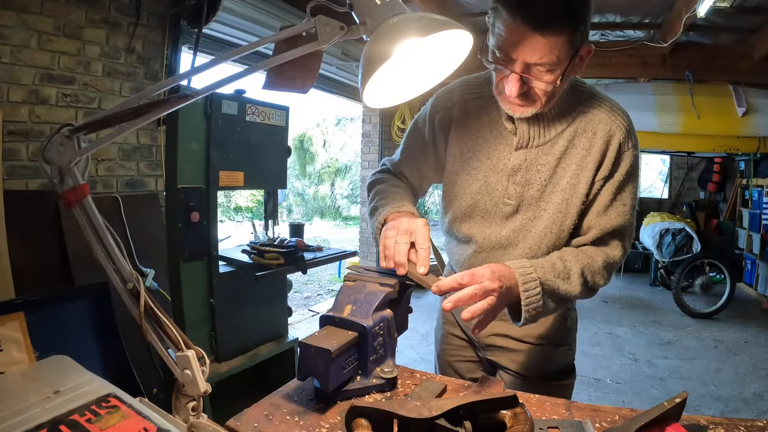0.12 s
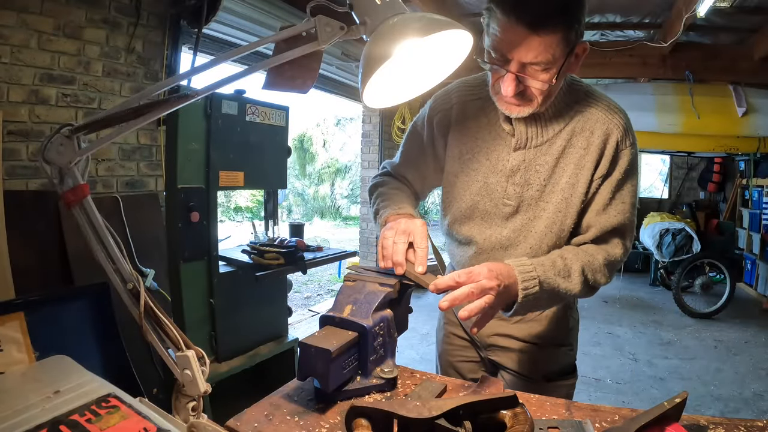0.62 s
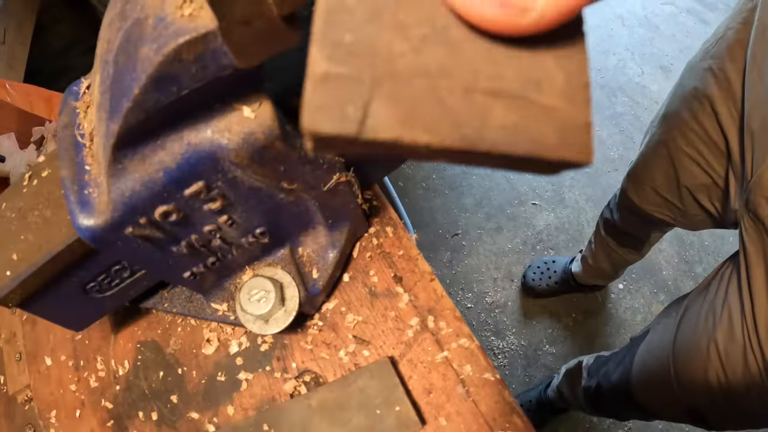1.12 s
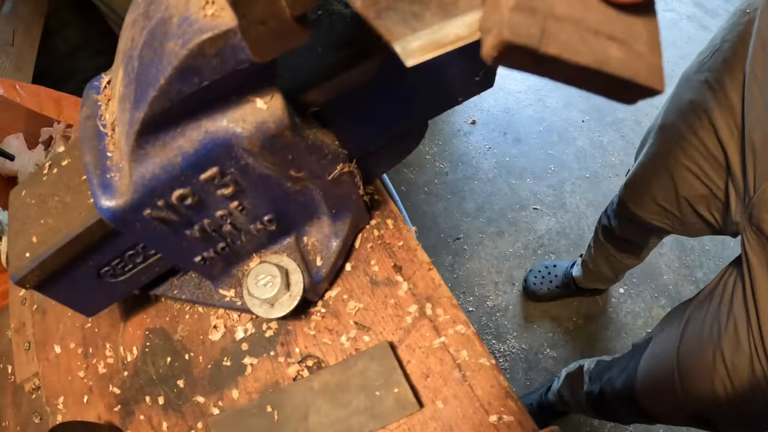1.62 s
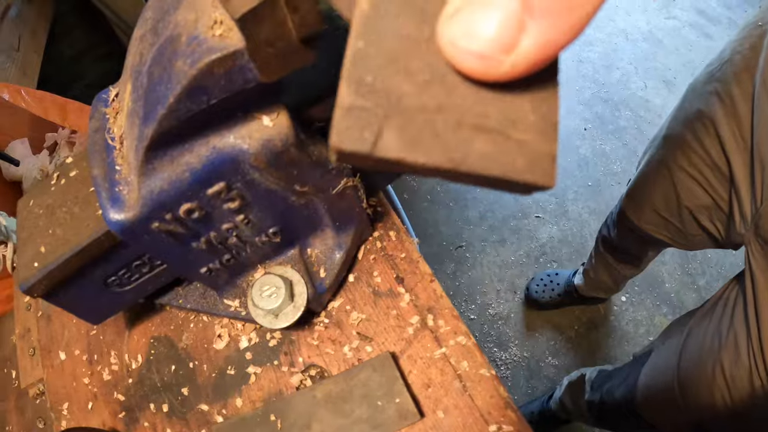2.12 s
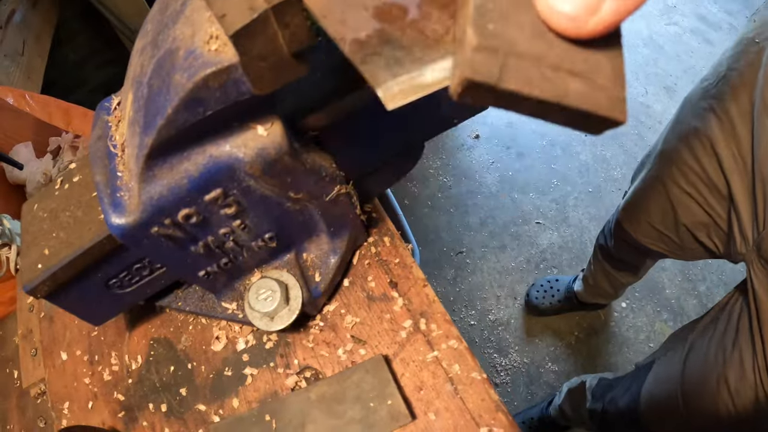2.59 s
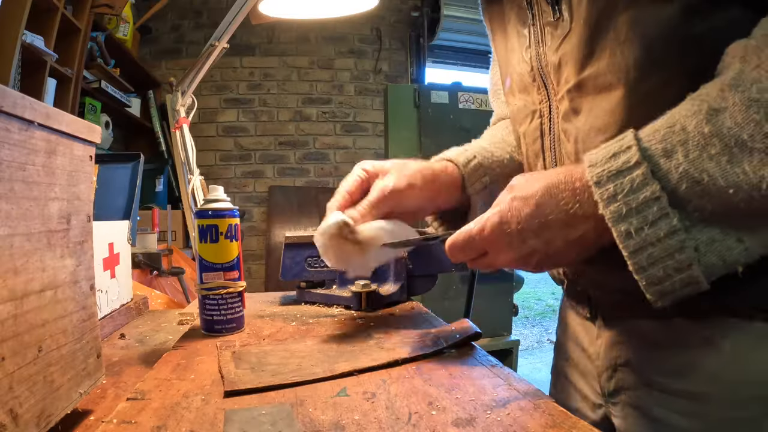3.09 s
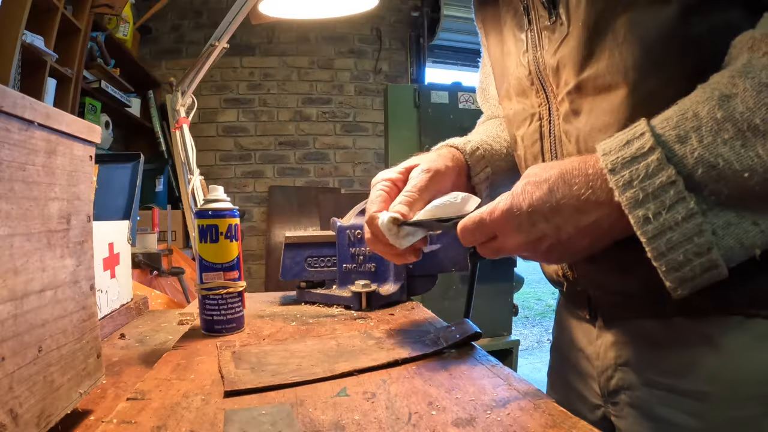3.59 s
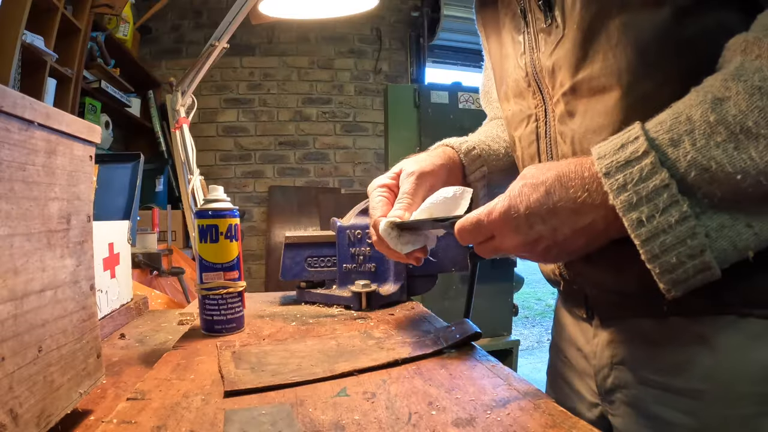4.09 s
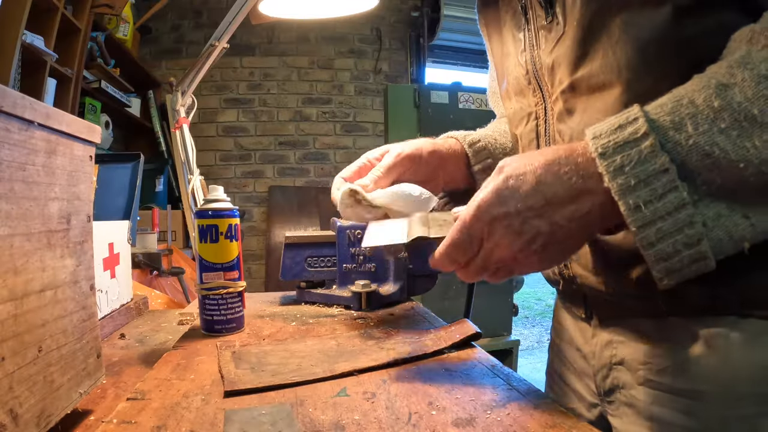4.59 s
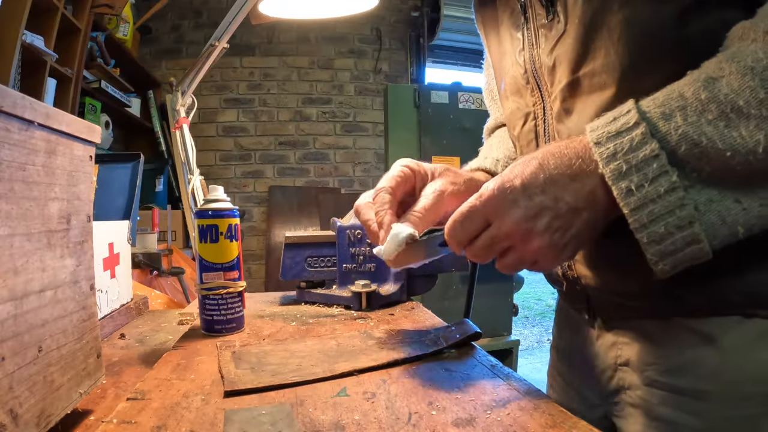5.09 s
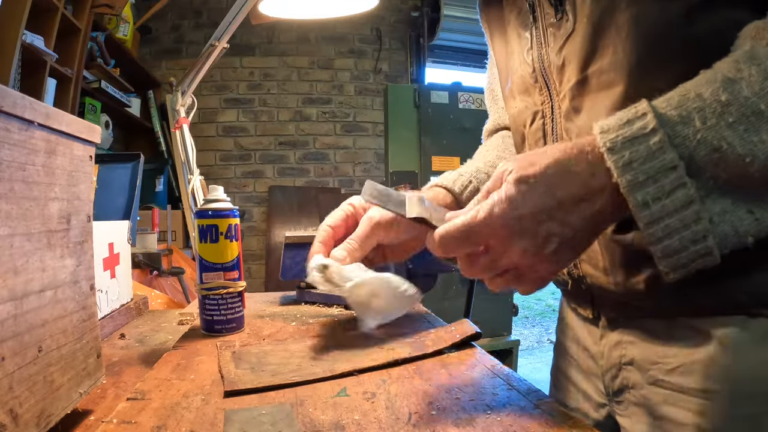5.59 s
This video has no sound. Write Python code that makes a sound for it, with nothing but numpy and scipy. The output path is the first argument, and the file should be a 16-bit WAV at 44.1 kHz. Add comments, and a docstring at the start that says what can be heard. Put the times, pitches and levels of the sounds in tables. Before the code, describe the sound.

From 0 to 0.9 s a sharpening stone scrapes back and forth on a clamped steel blade, heard from some distance: six quick, gritty strokes of about 0.13 s, with narrow metallic ringing, low bench rumble and dull knocks. At 0.94 s the view turns close and the rasp becomes much louder, drier and brighter. Strokes continue at roughly six or seven a second, each swelling and easing, with squeaky steel tones gliding up on one stroke and down on the next; a sharp squeal comes near 1.27 s. A low drone creeps in from 2 s. At 3.1 s the rasp cuts off. Much quieter, irregular rag wipes hiss along the loose blade, with light clinks around 4.8 s. A wipe grows from 5.07 s to a bright knock at 5.4 s, then a faint brush at 5.6 s. Soft air and a faint, wavering double hum remain, with short wall echoes.

```python
"""Sharpening a blade in the workshop

A hand-held stone rasps to and fro along a steel blade clamped in a vice, heard from afar, then close:
dense scratches drive the grit and the modes of the steel, and single modes sing as the stone travels.
After a cut, a rag hisses along the loose blade, which clinks now and then in the fingers.
Behind lie short wall echoes, soft air noise, a low drone before the cut and a faint double hum after it."""
import sys
import numpy as np
from scipy import signal
from scipy.fft import rfft, irfft, next_fast_len
from scipy.io import wavfile
from scipy.ndimage import uniform_filter1d

SR = 44100
rng = np.random.default_rng(int(sys.argv[2]) if len(sys.argv) > 2 else 0)


def transcribe(u):
    """Save the signal u as a 16-bit wav file named by the first command-line argument.

    u: samples, shape (n,) or (channels, n), limited to [-1, 1]; the rate is SR.
    q: integer samples, one column per channel.
    """
    v = np.clip(np.atleast_2d(u).T, -1, 1)
    q = np.round(v * 32767).astype(np.int16)
    wavfile.write(sys.argv[1], SR, q)


def convert_level_to_amplitude(level_db):
    """Map a level in decibels to its linear amplitude factor."""
    exponent = np.asarray(level_db, float) / 20
    return 10 ** exponent


N = 251789
TIME = np.arange(N) / SR
CLOSE_S, CUT_S = 0.94, 3.115  # the microphone is close from here; the stone gives way to the rag


def evened(x):
    """Scales to rms 1."""
    return x / np.sqrt(np.mean(x ** 2) + 1e-20)


def add(mix, s, sound):
    """Mixes a sound in at s seconds."""
    part = mix[max(round(s * SR), 0):][:len(sound)]
    part += sound[:len(part)]


def colour(x, points):
    """Filters x by a gain curve in dB, read on a log-frequency axis."""
    f, db = np.transpose(points)
    size = next_fast_len(len(x))
    hz = np.fft.rfftfreq(size, 1 / SR)
    gain = convert_level_to_amplitude(np.interp(np.log(hz + 1), np.log(f + 1), db))
    return irfft(rfft(x, size) * gain, size)[:len(x)]


def resonate(x, hz, width):
    """Shifts the curve hz down to zero, smooths, and shifts back: a resonance of gain 1."""
    turn = np.exp(2j * np.pi * np.cumsum(hz * np.ones(len(x))) / SR)
    r = np.exp(-np.pi * width / SR)
    return 2 * (turn * signal.lfilter([1 - r], [1, -r], x / turn)).real


def resonate_twice(x, hz, width, second_width):
    """Two resonances in a row at one pitch, for steeper skirts."""
    return resonate(resonate(x, hz, width), hz, second_width)


def wander(hz):
    """Slow random curve of rms 1, made coarsely and stretched."""
    size = N // 64 + 2
    fall = 1 / (1 + (np.fft.rfftfreq(size, 64 / SR) / hz) ** 4)
    coarse = irfft(rfft(rng.standard_normal(size)) * fall, size)
    return evened(np.interp(np.linspace(0, size - 1, N), np.arange(size), coarse))


def scratches(per_s, spread_db, clump_db):
    """Dense micro-impacts of uneven size, arriving in clumps."""
    size = convert_level_to_amplitude(spread_db * np.minimum(rng.exponential(1, N), 5))
    hits = size * (rng.random(N) < per_s / SR)
    return evened(hits * rng.standard_normal(N) * convert_level_to_amplitude(clump_db * wander(59)))


def body(drive, modes, drift_db, bend):
    """Modes whose strengths drift and whose pitches bend as the contact point travels."""
    total = np.zeros(N)
    for hz, width, db in modes:
        ring = evened(resonate_twice(drive, hz * bend, width, 2 * width))
        total += convert_level_to_amplitude(db + drift_db * wander(9.0)) * ring
    return evened(total)


def mottle(x, patchy_db):
    """Many small modes come and go: narrow patches of colour a few hundredths of a second long."""
    z = signal.stft(x, nperseg=512, noverlap=384)[2]
    patches = uniform_filter1d(rng.standard_normal(z.shape), size=2, axis=0)
    patches = uniform_filter1d(patches, size=14, axis=1)
    return evened(signal.istft(z * convert_level_to_amplitude(patchy_db * evened(patches)), nperseg=512, noverlap=384)[1][:N])


# stone strokes, out and back in turn: start_s, end_s, top_share (0-1 of the stroke, where it presses
# hardest), top_db (pressure there), singing_db
STROKES = [(0.0, 0.118, 0, -29, -39.5), (0.136, 0.263, 0.66, -31.5, -40), (0.283, 0.41, 0.24, -28.5, -33.5),
           (0.42, 0.552, 0.7, -28, -35), (0.561, 0.717, 0.28, -29.5, -32.5), (0.718, 0.859, 0.55, -29, -31),
           (0.948, 1.146, 0.57, -23.5, -26.5), (1.174, 1.314, 0.72, -19.5, -30),
           (1.337, 1.487, .5, -23, -22), (1.523, 1.663, 0.45, -23, -21.5), (1.688, 1.818, 0.45, -24, -22.5),
           (1.847, 1.985, 0.49, -24, -29), (2.005, 2.13, 0.53, -23.5, -21.5),
           (2.162, 2.29, .35, -25, -22.5), (2.297, 2.429, 0.53, -24, -23), (2.459, 2.597, 0.38, -25, -25),
           (2.605, 2.738, 0.62, -26, -23), (2.774, 2.904, 0.4, -24.5, -24), (2.922, 3.067, 0.4, -26, -26.5),
           (3.087, 3.104, 0.6, -30.5, -69)]
BACK_BITE, OUT_BITE, BITE_DB = 0.05, 0.13, -10  # landing: shares of a stroke, sharper on the way back
LIFT, LIFT_DB = 0.13, -8.5  # lifting: share of a stroke, and depth
BUILD_DB_PER_S, EASE_DB_PER_S = 87, 79  # pressure before and after its top


def stroke_level_db():
    """Each stroke bites quickly, builds to its top, eases off and lifts; pauses dip by up to 11 dB."""
    start, end, top, top_db, _ = np.transpose(STROKES)
    length, pause = end - start, start[1:] - end[:-1]
    bite = np.where(np.arange(len(end)) % 2, BACK_BITE, OUT_BITE)
    top = np.clip(top, bite, 1 - LIFT)
    early = top_db - BUILD_DB_PER_S * (top - bite) * length
    late = top_db - EASE_DB_PER_S * (1 - LIFT - top) * length
    corner_s = [start, start + bite * length, start + top * length, end - LIFT * length, end]
    corner_db = [early + BITE_DB, early, top_db, late, late + LIFT_DB]
    stroke_db = np.interp(TIME, np.ravel(corner_s, "F"), np.ravel(corner_db, "F"))
    pause_s = [end[:-1], end[:-1] + 0.5 * pause, start[1:]]
    dip_db = [0 * pause, np.maximum(-230 * pause, -11), 0 * pause]
    pause_db = np.interp(TIME, np.ravel(pause_s, "F"), np.ravel(dip_db, "F"))
    lifted_off_db = 900 * np.maximum(TIME - end[-1], 0)
    return stroke_db + pause_db - lifted_off_db


# clamped blade and vice from afar: mode_hz, width_hz, level_db (relative, drifting)
FAR_MODES = [(1180, 44, 2), (1544, 42, 4), (2066, 150, 6), (2770, 77, 16), (4242, 53, 16),
             (4815, 270, 17.5), (3500, 74, -10)]
# treble lost over the distance: freq_hz, gain_db
FAR_DULLING = [(3000, 1), (7000, -0.5), (10000, -4)]


def far_stone(drive, grit):
    """Heard from afar, the grit is duller and the modes of blade and vice stand out."""
    modes = body(drive, FAR_MODES, 4.9, 1 + 0.015 * wander(10.6))
    return colour(grit, FAR_DULLING) + convert_level_to_amplitude(-3.5) * modes


# clamped blade and vice close up: mode_hz, width_hz, level_db (relative, drifting)
NEAR_MODES = [(1155, 45, -15.5), (1654, 55, -9), (2653, 220, -6), (3570, 150, 1.5), (4640, 780, 0),
              (5620, 77, -6)]
ZING_HZ, ZING_OCTAVES, ZING_WIDTH_HZ = 3500, 0.8, 500  # centre, reach either way, width
ZING_DB, ZING_GROWS_S = 3, 1.3  # gain once grown, and time it takes to grow


def near_stone(drive, grit):
    """Close up, modes bend and a broad zing rides the contact point up and down, growing with time."""
    # the stone shortens the free edge on the way out (+1) and frees it on the way back (-1)
    end = np.transpose(STROKES)[1]
    place = np.interp(TIME, end, (-1.0) ** np.arange(len(end)))
    near = grit + convert_level_to_amplitude(-9) * body(drive, NEAR_MODES, 3.5, 1 + 0.024 * place)
    zing_hz = ZING_HZ * 2 ** (ZING_OCTAVES * np.sin(0.5 * np.pi * place))
    zing = resonate_twice(near, zing_hz, ZING_WIDTH_HZ, 2 * ZING_WIDTH_HZ)
    grown = np.clip((TIME - CLOSE_S) / ZING_GROWS_S, 0, 1)
    return evened(near + convert_level_to_amplitude(ZING_DB) * grown * zing)


# colour of the bench rumble: freq_hz, gain_db
RUMBLE = [(24, -56), (40, -25), (140, -9.5), (188, -9), (359, -5.5), (483, -14), (850, -13), (1300, -8),
          (2200, -120)]
# something shifts on the bench with a dull rustle: start_s, end_s, level_db, centre_hz
JOLTS = [(0.455, 0.596, -40.5, 346), (0.82, 0.954, -52, 197)]
BENCH_DB, BACK_DB = -46.5, -1.5  # rumble under strokes out; change on the way back


def bench():
    """The bench top rumbles and rings on one low mode; dull rustles are coloured noise."""
    start, end = np.transpose(STROKES)[:2]
    shake = colour(rng.standard_normal(N), RUMBLE)
    ring = np.where(TIME < CLOSE_S, 3.5, 1.8) * resonate(shake, 353.6, 8.6)
    change_db = BACK_DB * (np.arange(len(end)) % 2)
    rumble_db = BENCH_DB + np.interp(TIME, 0.5 * (start + end), change_db)
    out = convert_level_to_amplitude(rumble_db) * evened(shake + ring)
    for first, last, db, hz in JOLTS:
        shape = [(0.16 * hz, -20), (hz, 0.5), (3 * hz, -8), (5 * hz, -30)]
        rustle = evened(colour(rng.standard_normal(N), shape))
        outside_s = np.maximum(np.maximum(first - TIME, TIME - last), 0)
        out += convert_level_to_amplitude(db - 320 * outside_s) * rustle
    return out


# colour of stone grit on steel: freq_hz, gain_db
GRIT = [(240, -43), (400, -30), (940, -32), (1150, -11.5), (3110, -5.5), (3610, -1), (7230, -9.5),
        (8930, -28.5), (11700, -24), (13400, -36), (14700, -62)]


def stone():
    """Scratches of stone on steel drive grit and modes, under the pressure of the strokes."""
    drive = scratches(12000, 0.68, 1.32)
    grit = mottle(colour(drive, GRIT), 2.8)
    rasp = np.where(TIME < CLOSE_S, far_stone(drive, grit), near_stone(drive, grit))
    return (convert_level_to_amplitude(stroke_level_db()) * rasp + bench()) * (TIME < CUT_S)


# modes that sing in every stroke, from afar and close: mode_hz, length_s, level_db (added to
# singing_db), lag_s (on the way out; lead on the way back), glide_share (either side of mode_hz)
FAR_SONG = [(2738, 0.0762, 0.5, 0.00096, 0.0046), (4930, 0.092, 0.5, 0.0034, 0.0098)]
NEAR_SONG = [(3630, .075, -1.5, 0.001, 0.016), (4560, 0.057, -8, 0.037, 0.015),
             (2646, 0.03, -12.5, -0.028, 0.0079), (1680, 0.0562, -16.5, -.01, 0.0012)]
WIDENING_PER_S = 1.56  # the glides grow as the strokes reach further along the edge


def stroke_songs():
    """Near the hardest press a few modes sing, gliding up on the way out and down on the way back."""
    songs = []
    for k, (start, end, top, _, db) in enumerate(STROKES):
        way = (-1) ** k
        top_s = start + top * (end - start)
        reach = 1 + WIDENING_PER_S * max(start - CLOSE_S, 0)
        for hz, length, mode_db, lag, glide in (FAR_SONG if start < CLOSE_S else NEAR_SONG):
            bend = way * glide * reach
            begin = top_s + way * lag - length / 2
            songs.append((begin, length, hz * (1 - bend), hz * (1 + bend), db + mode_db))
    return songs


# single squeaks where another mode catches: start_s, length_s, first_hz, last_hz, level_db
SINGING = [(0.28, 0.056, 4330, 4170, -29), (0.788, 0.0435, 2330, 1400, -31.5),
           (1.041, 0.064, 2800, 3060, -30.5), (1.268, 0.05, 4800, 5400, -23.5),
           (1.269, 0.036, 4100, 4450, -19), (1.344, 0.036, 5650, 5400, -27.5),
           (1.343, 0.03, 4400, 4300, -27), (1.631, 0.018, 5900, 5800, -22.5), (0.78, 0.03, 4300, 3500, -31),
           (0.428, 0.042, 4760, 4960, -30), (0.0055, 0.024, 2740, 2770, -32.5),
           (2.2, 0.05, 4450, 4750, -26), (2.33, 0.054, 2470, 3050, -31.5),
           (2.813, 0.037, 1720, 1540, -32.5), (4.428, 0.12, 2500, 2200, -55),
           (5.602, 0.075, 2100, 2000, -50), (4.86, 0.022, 2800, 2800, -44), (5.357, 0.056, 1700, 1600, -40)]


def singing():
    """A mode swells, glides with the contact point and fades; higher modes are more damped."""
    out = np.zeros(N)
    for s, length, first_hz, last_hz, db in stroke_songs() + SINGING:
        hz = np.linspace(first_hz, last_hz, round(length * SR))
        drive = rng.standard_normal(len(hz))
        ring = evened(resonate_twice(drive, hz, 0.035 * first_hz, 0.07 * first_hz))
        add(out, s, convert_level_to_amplitude(db) * ring * signal.windows.tukey(len(hz), 0.6))
    return out


# rag strokes on the blade: start_s, end_s, first_db, last_db (pressure), dull_db (undertone against
# the hiss), hollow_hz (hollow of the hand)
WIPES = [(3.108, 3.23, -53, -68, -4, 3500), (3.278, 3.444, -42, -45, -6.5, 3430),
         (3.448, 3.589, -54, -52, -0.5, 3500), (3.897, 4.246, -39.5, -46, -36, 3804),
         (4.355, 4.52, -59.5, -50.5, -8.5, 2380), (4.572, 4.778, -50, -45.5, -13, 3050),
         (4.818, 4.917, -41, -51, -15.5, 3000), (4.953, 5.031, -60, -39.5, -5, 2647),
         (5.07, 5.423, -49.5, -32.5, -11.5, 4150), (5.594, 5.67, -51, -44, -14, 2050)]
# colour of fibres on steel: freq_hz, gain_db
RAG = [(60, -68), (240, -34), (400, -34), (974, -38), (1490, -13), (4140, -8), (6200, -17), (7400, -23.5),
       (9070, -47), (12300, -37.5), (14700, -66)]
# broad resonances of blade and cupped hand: mode_hz, width_hz, level_db (relative, drifting)
RAG_MODES = [(1500, 450, 7), (3000, 330, -11), (3370, 62, -8), (4230, 120, 10)]
# colour of the dull undertone: freq_hz, gain_db
UNDERTONE = [(60, -40), (250, 9), (500, 8.5), (900, 9.5), (1600, 12.5), (2600, -47)]
GRIP_DB_PER_S, LET_GO_DB_PER_S = 1400, 427  # how fast a wipe starts and ends
REST_DB = -58.5  # the rag lying loosely on the steel
HOLLOW_DB, HOLLOW_WIDTH = -12, 0.34  # level against the hiss; width as a share of hollow_hz
SETTLE_DB, SETTLE_S = 6, 0.024  # a wipe lands lightly and settles into its pressure


def rag():
    """Fibres hiss over the steel and stir broad resonances of blade and cupped hand."""
    drive = scratches(7000, 0.48, 0.67)
    modes = body(drive, RAG_MODES, 2.3, 1 + 0.014 * wander(6.1))
    hiss = mottle(colour(drive, RAG), 2.1) + convert_level_to_amplitude(-19) * modes
    dull = evened(colour(drive, UNDERTONE))
    out = convert_level_to_amplitude(REST_DB) * hiss
    for start, end, first_db, last_db, dull_db, hz in WIPES:
        width = HOLLOW_WIDTH * hz
        hollow = convert_level_to_amplitude(HOLLOW_DB) * evened(resonate_twice(drive, hz, width, 2 * width))
        since_start = np.maximum(TIME - start, 0)
        fade_db = GRIP_DB_PER_S * np.maximum(start - TIME, 0)
        fade_db += LET_GO_DB_PER_S * np.maximum(TIME - end, 0)
        fade_db += SETTLE_DB * np.exp(-since_start / SETTLE_S)
        pressure_db = np.interp(TIME, [start, end], [first_db, last_db])
        out += convert_level_to_amplitude(pressure_db - fade_db) * (hiss + hollow + convert_level_to_amplitude(dull_db) * dull)
    return (TIME > CUT_S) * out


# loose blade knocked in the fingers: start_s, level_db (peak of the ring, before crack and colour)
CLINKS = [(4.7616, -34), (4.8195, -19.5), (4.8441, -22), (4.854, -31), (4.8588, -28), (4.875, -40)]
# loose blade modes: mode_hz, level_db (relative, before a random lift of 0-13 dB), t60_s
LOOSE_MODES = [(2840, -22, 0.03), (5200, 2, 0.02), (5500, 0, 0.024), (5760, 0, 0.025), (6270, -18, 0.022),
               (7270, -6.5, 0.058)]


def clinks():
    """Decaying sines ring the loose blade briefly under a short noisy crack."""
    out, t = np.zeros(N), np.arange(6000) / SR
    for s, db in CLINKS:
        ring = np.zeros(len(t))
        for hz, mode_db, t60 in LOOSE_MODES:
            lift_db, phase = 13 * rng.random(), rng.random()
            ring += convert_level_to_amplitude(mode_db + lift_db - 60 * t / t60) * np.sin(2 * np.pi * (hz * t + phase))
        ring *= 1 - np.exp(-t / 0.0004)
        crack = resonate(resonate(rng.standard_normal(6000), 5400, 2000), 5900, 2600)
        crack *= 0.83 * convert_level_to_amplitude(-60 * t / 0.051)
        add(out, s, convert_level_to_amplitude(db) * (ring / abs(ring).max() + crack))
    return out


# knocks of hand, stone and rag: start_s, level_db (peak, before the colour), centre_hz
THUDS = [(0.003, -36, 307), (0.47, -35, 328.7), (0.441, -37, 290), (0.833, -34.5, 240), (0.73, -33, 350),
         (0.878, -34, 303), (0.897, -37.5, 149), (0.19, -32, 1940), (2.299, -20, 5556), (0.892, -29, 4600),
         (1.725, -37.5, 345), (2.045, -34.5, 355), (5.9, -44.5, 380), (5.394, -32, 3000),
         (5.401, -20, 4270), (5.409, -22.5, 1230), (5.405, -35, 317), (5.424, -30, 1500), (5.66, -38, 327)]


def thuds():
    """Puffs of resonant noise a few cycles long."""
    out, t = np.zeros(N), np.arange(6000) / SR
    for s, db, hz in THUDS:
        shape = convert_level_to_amplitude(-60 * t * hz / 32) * (1 - np.exp(-t * hz / 0.48))
        puff = resonate_twice(rng.standard_normal(6000) * shape, hz, 0.16 * hz, 0.5 * hz)
        add(out, s, convert_level_to_amplitude(db) * puff / abs(puff).max())
    return out


def knocks():
    """Clinks and thuds come from small bodies: no deep bass, highest modes damped."""
    return colour(clinks() + thuds(), [(30, -50), (70, -24), (160, 0.5), (7600, 1.5), (9200, -5)])


def walls(x):
    """A short sparse tail off brick and bench."""
    t = np.arange(8000) / SR
    echoes = rng.standard_normal(8000) * (rng.random(8000) < 0.05)
    tail = echoes * convert_level_to_amplitude(-60 * t / 0.07) * (t > 0.004)
    return signal.fftconvolve(x, tail / np.linalg.norm(tail))[:N]


# colour of the air noise: freq_hz, gain_db
AIR = [(18, -57), (30, -35), (95, -29), (206, -4.5), (482, -17), (950, -24), (1500, -18.5), (4400, -29.5),
       (12000, -59.5), (14000, -76)]
# a low tone creeps in before the cut: start_s, centre_hz, width_hz, level_db
DRONE = (2, 149.5, 11, -55)
# distant machine, each tone wavering: pitch_hz, level_db (peak)
HUM = [(192, -50.5), (215, -51.5)]


def workshop():
    """Soft air noise throughout; a low drone before the cut, then two beating tones of a distant machine."""
    air = convert_level_to_amplitude(-53) * evened(colour(rng.standard_normal(N), AIR))
    start, centre_hz, width_hz, drone_db = DRONE
    drone = convert_level_to_amplitude(drone_db) * evened(resonate(rng.standard_normal(N), centre_hz, width_hz))
    drone *= np.clip((TIME - start) / 0.23, 0, 1) * (TIME < CUT_S)
    hum = np.zeros(N)
    for hz, db in HUM:
        phase = 2 * np.pi * np.cumsum(hz + 1.2 * wander(3)) / SR
        hum += convert_level_to_amplitude(db + 1.5 * wander(4)) * np.sin(phase)
    return air + drone + hum * np.clip((TIME - CUT_S) / 0.066, 0, 1)


# stereo width: freq_hz, side_db (against the mid)
WIDTH = [(60, -24), (200, -35.5), (700, -25), (1500, -36.5), (7000, -37), (10000, -21), (13000, 7.5)]


def scene():
    """All sources sit at the centre; a phase-scrambled copy, faint below the top treble, is the side."""
    before, song = TIME < CUT_S, singing()
    sharpening = stone() + song * before
    wiping = rag() + song * ~before + knocks()
    echoes = walls(sharpening) * before + walls(wiping)
    mid = sharpening + wiping + workshop() + convert_level_to_amplitude(-12) * echoes
    z = signal.stft(mid, nperseg=512)[2]
    scrambled = signal.istft(z * np.exp(2j * np.pi * rng.random(z.shape)), nperseg=512)[1][:N]
    side = colour(scrambled, WIDTH)
    return np.array([mid + side, mid - side])


def roll_off(x):
    """The treble ends steeply here."""
    return signal.sosfilt(signal.butter(12, 14840, fs=SR, output="sos"), x)


def record(dry):
    """The microphone's band: a slight dip in the bass and a steep fall in the top treble."""
    band = [(40, -1.5), (130, -0.5), (14000, 0), (14800, -14)]
    mix = np.array([colour(channel, band) for channel in dry])
    return roll_off(mix)


dry = scene()
out = record(dry)
transcribe(out)
```